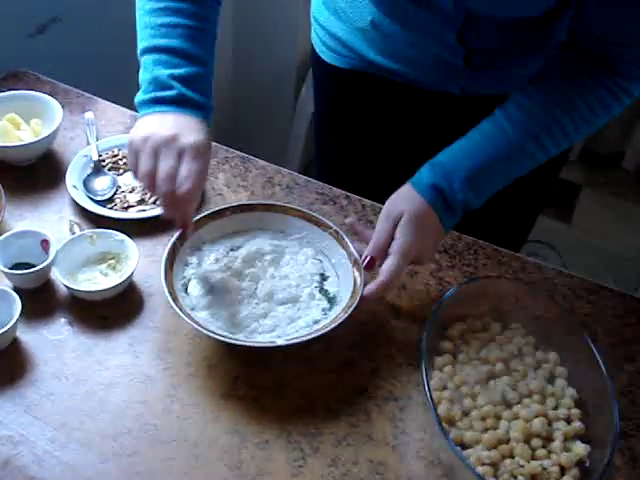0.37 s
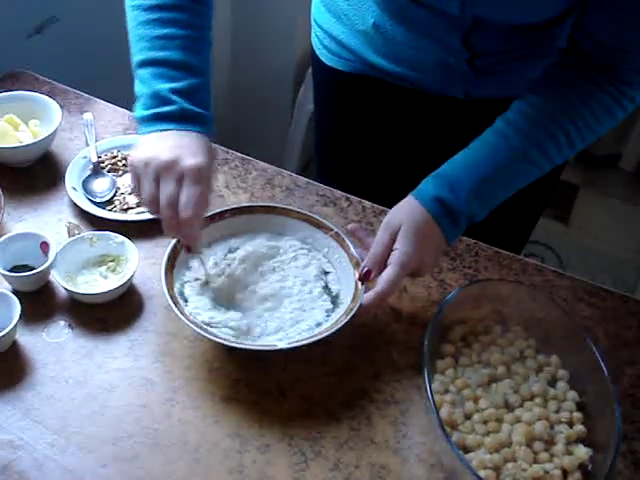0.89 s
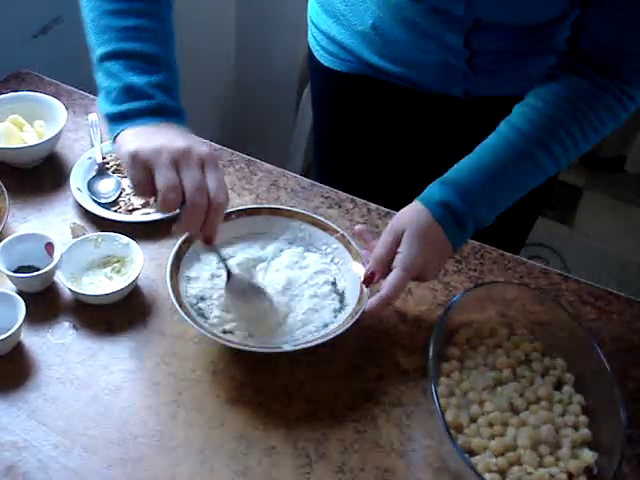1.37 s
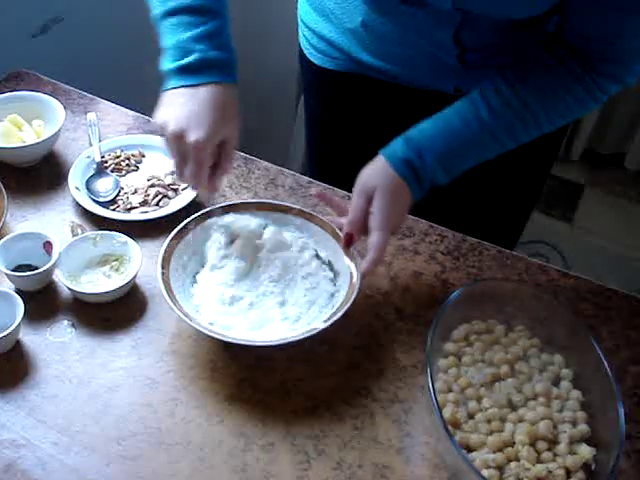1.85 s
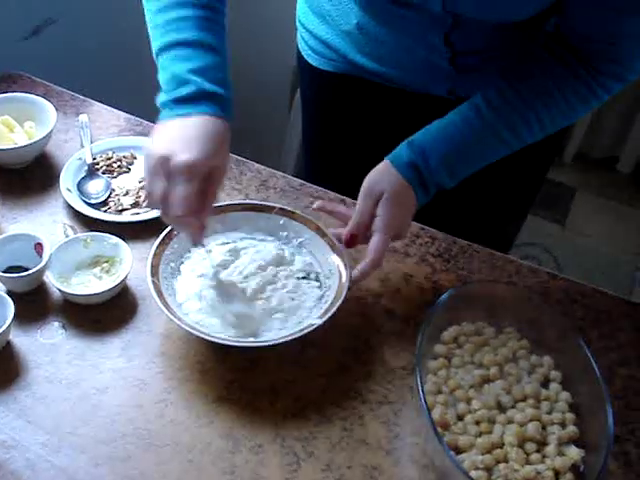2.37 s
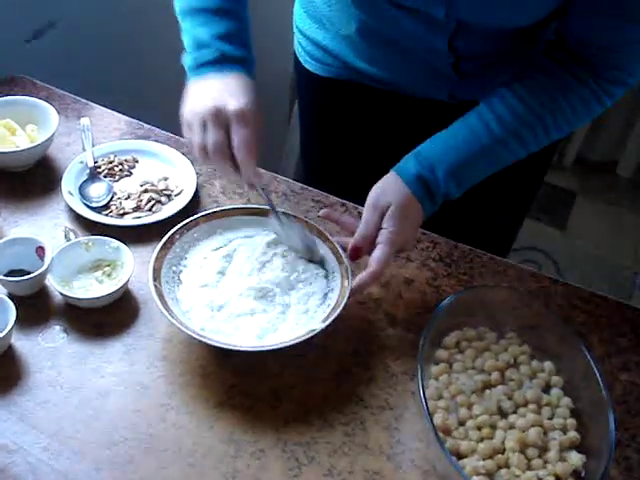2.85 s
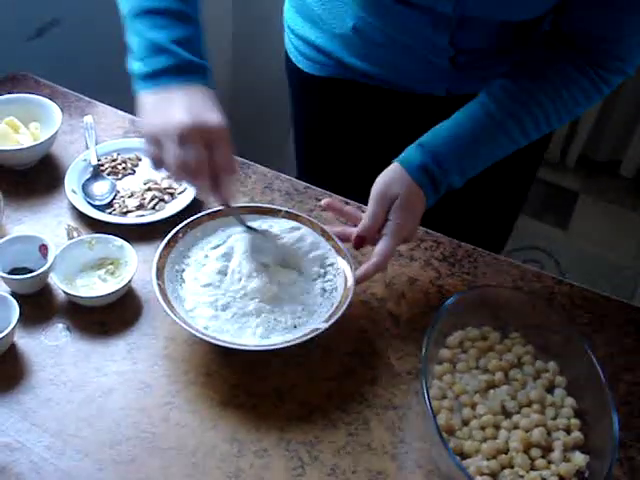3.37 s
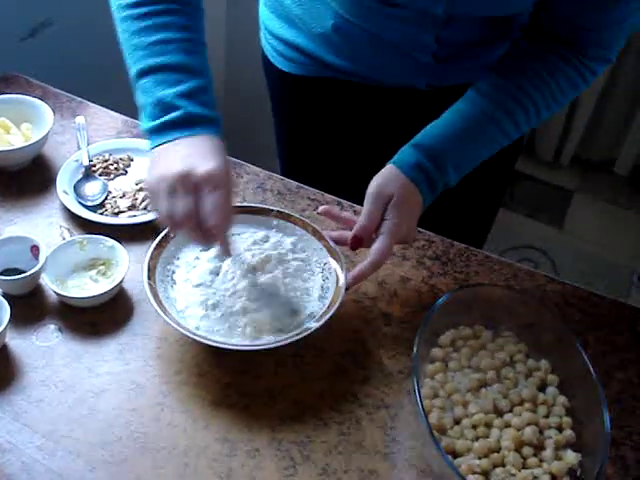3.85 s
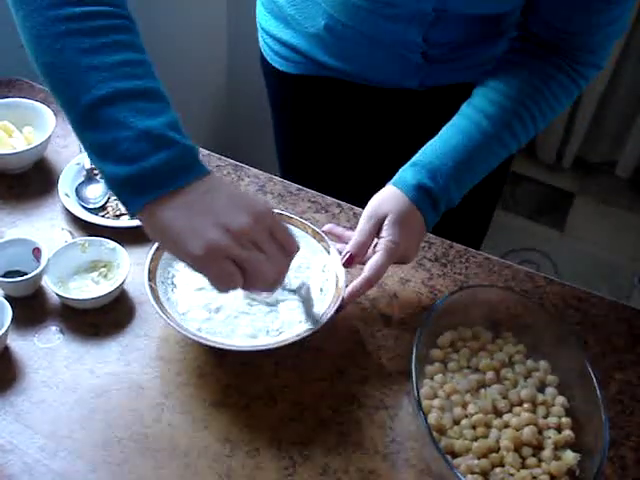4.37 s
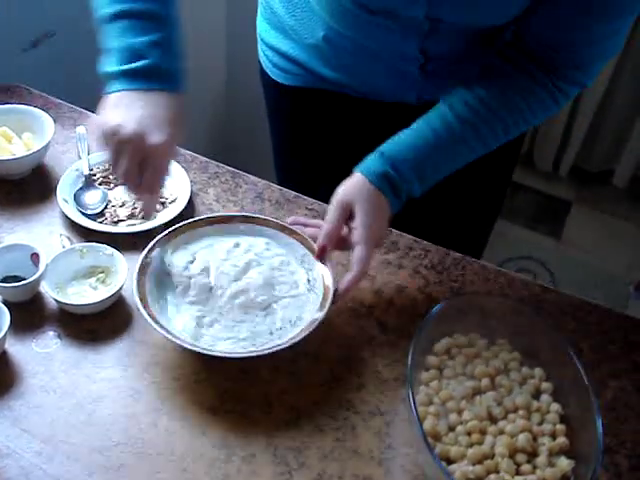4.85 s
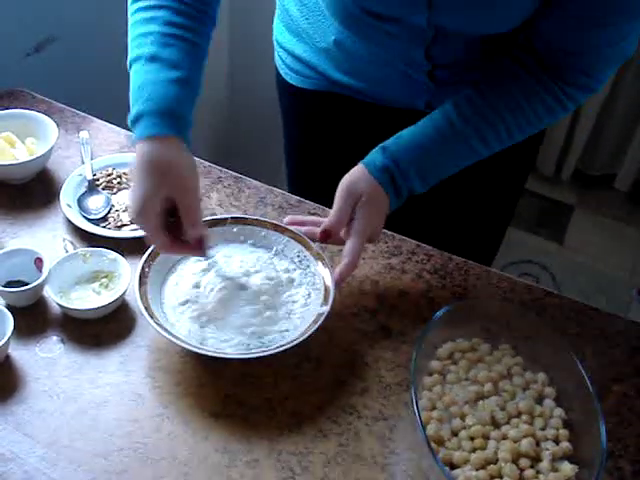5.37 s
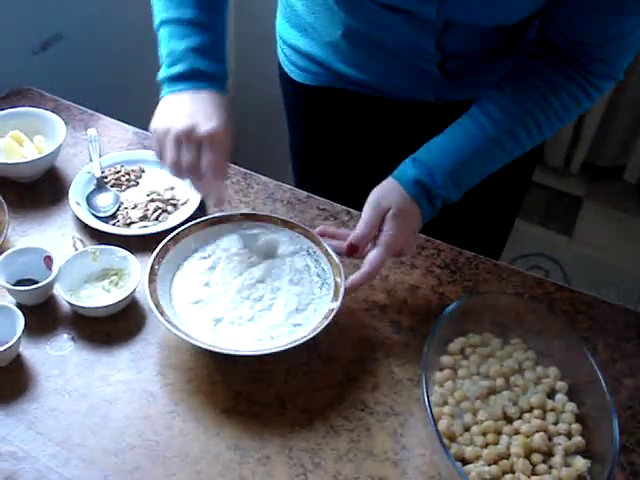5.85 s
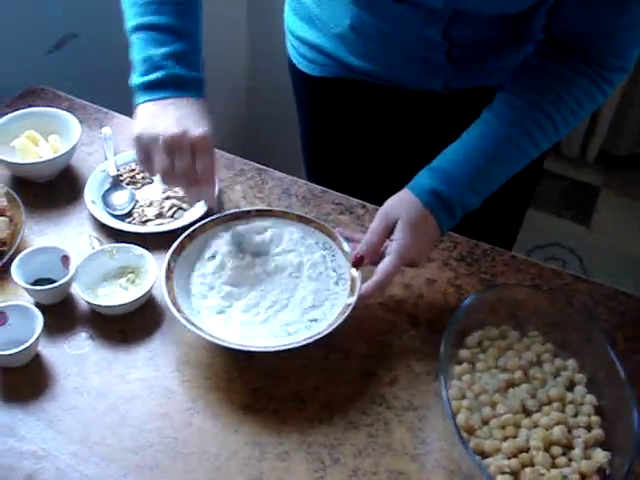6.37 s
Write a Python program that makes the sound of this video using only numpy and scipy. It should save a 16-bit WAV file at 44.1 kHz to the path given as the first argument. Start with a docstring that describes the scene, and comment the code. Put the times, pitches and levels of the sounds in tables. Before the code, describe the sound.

A steady bed of low room rumble, soft hiss, faint hums and a barely audible high whine runs throughout, captured by a small, dull-topped microphone in a hard-walled kitchen. A metal spoon gives light, short clinks on a yogurt-filled ceramic bowl at 0.8 and 1.3 seconds, then a weaker tick at 1.6 leading into a muffled drag until about 2.0, with dull taps at 1.9 and 2.1. A faint brush follows at 2.45. A firm, bright clink lands at 2.9, lighter ones at 3.2 and 3.3, the strongest at 3.7, then tiny taps near 3.9. After a pause, a knock at 4.5 opens a louder, gritty scrape to 5.1, with three brief, swelling, mid-pitched throbs between 4.65 and 4.8. A duller knock comes at 5.06, a very faint brush near 5.3, and a crisp clink at 5.9, leaving room tone.

```python
"""Knocks and two scraping drags of a metal spoon in a ceramic bowl of thick yogurt, in a hard-walled kitchen,
over room rumble, microphone hiss, faint hums and a thin whine; a few faint brushes and brief singing throbs.
Knocks ring the counter's thump and the damped modes of bowl and spoon; drags drive the modes with stick-slip
clicks; brushes are noise puffs. Sparse echoes carry knocks, drags and brushes on; the singing is swelling
sines, the floor shaped noise."""
import sys
import numpy as np
from scipy import signal
from scipy.io import wavfile
from scipy.ndimage import uniform_filter1d

SR = 44100
rng = np.random.default_rng(int(sys.argv[2]) if len(sys.argv) > 2 else 0)


def attenuation_scalar(level_db):
    """Turn a level in dB into a linear amplitude multiplier (20 dB per decade)."""
    decades = np.asarray(level_db, float) / 20
    return 10 ** decades


def generate_wav(signal):
    """Clip the signal to [-1, 1] and save it as 16-bit WAV at the path in sys.argv[1]."""
    frames = np.transpose(np.atleast_2d(signal))
    scaled = np.clip(frames, -1, 1) * 32767
    pcm = np.round(scaled).astype(np.int16)
    wavfile.write(sys.argv[1], SR, pcm)


N = 286209

# Thump of the counter (first row), then modes of bowl and spoon, heavily damped by the yogurt.
# Each row: frequency in Hz, relative level in dB, nominal t60 in seconds.
MODES = [(182, -2, .12), (311, -1, 0.093), (388.6, 1, 0.068), (503, -2.5, 0.037), (610.5, -7, 0.23),
         (633.4, -3, 0.074), (692, -5.5, .25), (930, -3.5, 0.011), (1087, -3, 0.015), (1294, -1, 0.023),
         (1461, -2, 0.056), (1572, -2.5, 0.052), (1745, 1, 0.013), (1930, -12, 0.048), (2260, -14.5, 0.088),
         (2383, -3, 0.022), (2627, -0.5, 0.024), (2736, 0.5, 0.024), (3010, -5, 0.012), (3545, -5.5, 0.029),
         (3694, 1, 0.015), (3999, 4.5, 0.038), (4163, -6, 0.075), (4585, 9.5, 0.009), (5105, 4.5, 0.039),
         (5452, 8, 0.057), (5707, 6, 0.037), (6200, -12, 0.012), (7000, 1, .02), (7830, -3.5, 0.045),
         (8510, -4.5, 0.029), (8240, -1, 0.029)]
# Ranges of ringing that a contact favours. Entries in Hz: thud, lowest ring, second to fifth ring, top.
RANGES_HZ = [300, 640, 1500, 2650, 3950, 5200, 8300]
# Spoon blows. Each row: start in seconds, relative strength in dB, lowest ring against it in dB,
# hardness in dB, extra fifth ring and top from the spoon's edge in dB.
KNOCKS = [(0.775, -26, -6, 1, 7), (1.259, -24, -6, 3.5, 2.5), (1.5634, -31, -2, 5.5, -0.5),
          (1.8878, -27.5, -6.5, -6, -22), (2.0829, -33.5, -14, -1.5, -41), (2.9093, -17, -6, 4, 6),
          (3.1807, -26.5, -3.5, 5.5, 7), (3.3256, -25.5, -15.5, -5.5, -42), (3.7109, -15, -7.5, 5.5, -1.5),
          (3.8761, -41.5, 5.5, -14, 0), (3.9024, -32.5, -5, -11.5, -19), (4.487, -25.5, -4, 2, 3),
          (5.0604, -23, -12.5, -5.5, -21), (5.9387, -20, -9.5, 0, 9)]
# Drags along the wall, one list each. Each row: time in seconds, relative pressure in dB,
# depth in the yogurt from 0 to 1.
DRAGS = [
    [(1.63, -59, 0.9), (1.67, -46.5, 0.7), (1.73, -38, 0.77), (1.8, -33, .4), (1.87, -43, 0.84),
     (1.93, -45, .8), (2.0, -50.5, 0.94), (2.07, -68, .95)],
    [(4.53, -63, 0.4), (4.555, -38.5, 0.2), (4.577, -30, 0.07), (4.62, -35, 0), (4.68, -27.5, 0.08),
     (4.76, -31.5, .1), (4.82, -35.5, 0.37), (4.9, -32.5, 0.62), (4.98, -32.5, 0.51), (5.03, -39.5, 0.72),
     (5.08, -55, 1)],
]
# Spoon brushing through the yogurt. Each row: centre in seconds, rms level at the centre in dB,
# frequency in Hz, time from the centre to 1/e in seconds.
BRUSHES = [(2.443, -46.5, 960, 0.0071), (2.464, -54, 930, 0.0062), (5.26, -58, 1930, 0.079),
           (5.282, -58.5, 3650, 0.024)]
# Echo decay of the kitchen. Each row: frequency in Hz, t60 in seconds.
KITCHEN = [(250, 0.51), (700, 0.38), (2000, 0.3), (5000, 0.28), (9000, 0.23)]
# Spectrum of rumble and hiss. Each row: frequency in Hz, relative level in dB per Hz.
FLOOR = [(15, -62.5), (25, -6.5), (70, -28), (97, -2), (148, -8), (163, -1.5), (232, -4.5), (383, -5),
         (557, -5), (733, -7.5), (896, -5.5), (1480, -11.5), (7520, -22), (8310, -20), (9900, -25.5),
         (12900, -62.5), (21800, -120)]
# Wavering hums. Each row: frequency in Hz, rms level in dB, width in Hz.
HUMS = [(105.8, -72, 3.6), (140.3, -66, 10), (226.3, -63, 9.8), (930, -75, 22)]
# Throbs of the slipping spoon locked onto the lowest ring. Each row: start in seconds,
# start of the quick fall in seconds, top rms level in dB, frequency in Hz.
SINGING = [(4.656, 4.707, -30.5, 631), (4.715, 4.756, -19, 633), (4.768, 4.785, -23, 642)]
# Upper rings of a knock. Entries in dB: third, fourth, fifth ring, top.
UPPER_DB = [1.5, -3.5, -20, -17]
# Share of the hardness each upper ring gains. Entries as factors: third, fourth, fifth ring, top.
UPPER_SHARE = [0.82, 0.91, 1.8, 0.28]
# Drag colour above the yogurt. Entries in relative dB, one for each of RANGES_HZ.
DRY_DB = [-48, -5, 3.5, -2.5, -11, -7, -7]
# Drag colour deep in the yogurt. Entries in relative dB, one for each of RANGES_HZ.
DEEP_DB = [13, 5, 3, -0.5, -17, -25, -27]


def evened(x):
    """Scales to rms 1."""
    return x / np.sqrt(np.mean(x ** 2) + 1e-20)


def read(points, hz):
    """Reads a spectrum table on a log-frequency axis."""
    f, value = np.transpose(points)
    return np.interp(np.log(hz + 1), np.log(f + 1), value)


def ring(x, hz, t60_s):
    """One decaying mode as a two-pole resonator; a unit click rings with height 1."""
    r = 10 ** (-3 / (t60_s * SR))
    turn = 2 * np.pi * hz / SR
    return signal.lfilter([np.sin(turn)], [1, -2 * r * np.cos(turn), r * r], x)


def floor(floor_db=-53.5):
    """Rumble and hiss as shaped noise with faint drifting patches, plus hums of narrow noise."""
    frames, hz = N // 512 + 5, np.fft.rfftfreq(2048, 1 / SR)
    real, imag, patches = rng.standard_normal((3, len(hz), frames))
    patches = uniform_filter1d(patches, size=20, axis=0)
    patches = evened(uniform_filter1d(patches, size=8, axis=1))
    # the distant rumble is patchier than the hiss
    patchy_db = 1.9 * np.clip(1500 / (hz + 1), .2, 1)[:, None]
    z = (real + 1j * imag) * attenuation_scalar(read(FLOOR, hz)[:, None] + patchy_db * patches)
    noise = signal.istft(z, nperseg=2048, noverlap=1536)[1][:N]
    out = attenuation_scalar(floor_db) * evened(noise)
    for f, db, width_hz in HUMS:
        out += attenuation_scalar(db) * evened(ring(rng.standard_normal(N), f, 2.4 / width_hz))
    return out


def whine(hz=8123, rms_db=-76):
    """A steady electronic sine."""
    return np.sqrt(2) * attenuation_scalar(rms_db) * np.sin(2 * np.pi * hz * np.arange(N) / SR)


def blend(levels_db, hz):
    """Level at hz between the favoured ranges; levels_db holds one row a range."""
    place = np.interp(np.log(hz), np.log(RANGES_HZ), range(len(RANGES_HZ)))
    return sum(max(1 - abs(place - k), 0) * row for k, row in enumerate(levels_db))


def knocks(knock_db=-4, thud_db=-9):
    """Each blow rings all rows of MODES, weighted and detuned by the place hit; a few ms of rattle lie on top."""
    t, out = np.arange(8000) / SR, np.zeros(N + SR)
    place_db, detune = 2.5, .007  # standard deviations
    rise_s, crack_db, rattle_s = .0014, -28, .0057
    for s, second_db, low_db, hard_db, edge_db in KNOCKS:
        upper_db = UPPER_DB + hard_db * np.array(UPPER_SHARE)
        levels_db = second_db + np.r_[low_db + thud_db, low_db, 0, upper_db]
        levels_db[-2:] += edge_db
        # a weak blow leaves the spoon resting on the wall: short ring
        free = np.clip(attenuation_scalar(0.17 * (second_db + 20.5)), .35, 1.1)
        sound = np.zeros(len(t))
        for hz, db, t60_s in MODES:
            weight, shift, phase = rng.standard_normal(3)  # phase in turns
            size_db = blend(levels_db, hz) + db + knock_db + place_db * weight
            decay = attenuation_scalar(size_db - 60 * t / (free * t60_s))
            sound += decay * np.sin(2 * np.pi * (hz * (1 + detune * shift) * t + phase))
        rattle = np.zeros(len(t))
        rattle[:1800] = rng.standard_normal(1800) * np.exp(-t[:1800] / rattle_s)
        clicks = np.diff(rattle, prepend=0)
        for hz in np.geomspace(400, 5600, num=14):
            band = ring(clicks, hz, 12 / hz) * 32000 / (hz + 2500)
            sound += attenuation_scalar(blend(levels_db, hz) + crack_db) * band
        at = round(s * SR)
        out[at:at + len(t)] += sound * (1 - np.exp(-t / rise_s))  # the yogurt cushions the contact
    return out[:N]


def kitchen(x):
    """Sparse echoes of random sign, each band dying at its own speed; three tails trade weight in rotation."""
    out, t_all = np.zeros(N), np.arange(N) / SR
    for k in range(3):
        taps = np.zeros(SR // 2)
        at = np.arange(160, len(taps) - 20, 20)
        taps[at + rng.integers(0, 20, len(at))] = rng.choice([-1., 1.], len(at))
        hz, t, z = signal.stft(taps, SR, nperseg=256)
        z = z * attenuation_scalar(-60 * t / read(KITCHEN, hz)[:, None])
        tail = signal.istft(z, SR, nperseg=256)[1]
        # 3.1 Hz rotation stands for the moving spoon
        turn = np.sqrt(2 / 3) * np.cos(2 * np.pi * (3.1 * t_all + k / 3))
        out += signal.fftconvolve(x * turn, tail / np.linalg.norm(tail))[:N]
    return out


def resonate(x, hz, width_hz):
    """A moving resonance of gain 1: shifts the curve hz down to zero, smooths, and shifts back."""
    turn = np.exp(2j * np.pi * np.cumsum(hz) / SR)
    r = np.exp(-np.pi * width_hz / SR)
    return 2 * (turn * signal.lfilter([1 - r], [1, -r], x / turn)).real


def slow_wander(t):
    """Six slow sines of random phase, 2 to 14 Hz, at rms 1."""
    return evened(sum(np.sin(2 * np.pi * (f * t + rng.random())) for f in np.geomspace(2, 14, num=6)))


def stick_slip(n):
    """Dense clicks of uneven size, clumped by rough spots in the glaze."""
    size = attenuation_scalar(3 * np.minimum(rng.exponential(1, n), 4))
    clumps = attenuation_scalar(1.8 * evened(uniform_filter1d(rng.standard_normal(n), size=300)))
    return evened(rng.standard_normal(n) * size * clumps * (rng.random(n) < .2))


def drags(drag_db=-10, grit_db=-3, pressed=0.89):
    """Stick-slip drives modes widened by the pressing spoon, each wandering as the contact moves."""
    out, wander_db, drift = np.zeros(N), 2.5, .012
    for rows in DRAGS:
        s, pressure_db, depth = np.transpose(rows)
        depth = np.clip(depth, 0, 1)
        t = np.arange(s[0], s[-1], 1 / SR)
        levels_db = [np.interp(t, s, pressure_db + dry_db + (deep_db - dry_db) * depth)
                     for dry_db, deep_db in zip(DRY_DB, DEEP_DB)]
        slips = stick_slip(len(t))
        sound = np.zeros(len(t))
        for hz, db, t60_s in MODES[1:]:  # the counter's thump needs a blow
            wander, bend = slow_wander(t), slow_wander(t)
            line_hz, width_hz = hz * (1 + drift * bend), pressed / t60_s + 50
            # twice: dark between the modes
            rung = resonate(resonate(slips, line_hz, width_hz), line_hz, 3 * width_hz)
            sound += attenuation_scalar(blend(levels_db, hz) + db + wander_db * wander) * evened(rung)
        for hz in np.geomspace(260, 8000, num=22):  # grit between the modes
            band = signal.butter(2, [hz / 1.12, hz * 1.12], "band", fs=SR, output="sos")
            sound += attenuation_scalar(blend(levels_db, hz) + grit_db) * evened(signal.sosfilt(band, slips))
        at = round(s[0] * SR)
        out[at:at + len(t)] += attenuation_scalar(drag_db) * sound * signal.windows.tukey(len(t), .08)
    return out


def brushes():
    """Soft puffs of narrow noise."""
    t, out = np.arange(N) / SR, np.zeros(N)
    for s, db, hz, length_s in BRUSHES:
        noise = evened(ring(rng.standard_normal(N), hz, 12 / hz))
        out += attenuation_scalar(db) * np.exp(-((t - s) / length_s) ** 2) * noise
    return out


def singing(swell_db=15, fall_s=0.0047):
    """Near-pure, slightly rough throbs at the lowest ring; each swells, then breaks off quickly."""
    t, out = np.arange(N) / SR, np.zeros(N)
    rough = 1 + 0.024 * evened(uniform_filter1d(rng.standard_normal(N), size=150))
    for start, end, top_db, hz in SINGING:
        grown = np.clip((t - start) / (end - start), 0, 1)
        level = attenuation_scalar(top_db - swell_db * (1 - grown) ** 2) * np.minimum(8 * grown, 1)
        fall = np.exp(-(np.maximum(t - end, 0) / fall_s) ** 2)
        out += level * fall * np.sin(2 * np.pi * hz * t)
    return np.sqrt(2) * rough * out


def scene(low_cut_hz=164, high_cut_hz=9200, echo_db=-3.5):
    """Sums band-limited contacts, their echoes, the singing, the floor and the whine."""
    near = knocks() + drags() + brushes()
    # a small bowl radiates no deep bass
    near = signal.sosfilt(signal.butter(4, low_cut_hz, "high", fs=SR, output="sos"), near)
    # the small microphone loses the very top
    near = signal.sosfilt(signal.butter(6, high_cut_hz, fs=SR, output="sos"), near)
    return (near + singing() + attenuation_scalar(echo_db) * kitchen(near) + floor() + whine())[None]


def band_limit(x):
    """A steep low-pass at the top of the band."""
    return signal.sosfilt(signal.butter(12, 10180, fs=SR, output="sos"), x)


def record(dry):
    """Band limit of the camera: a steep linear-phase low-pass at 10080 Hz."""
    edge = signal.firwin(601, 10080, window=("kaiser", 9), fs=SR)
    mix = signal.oaconvolve(dry, edge[None], "same")
    return band_limit(mix)


dry = scene()
out = record(dry)
generate_wav(out)
```